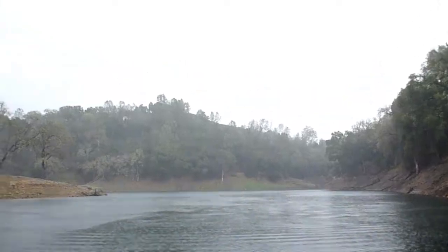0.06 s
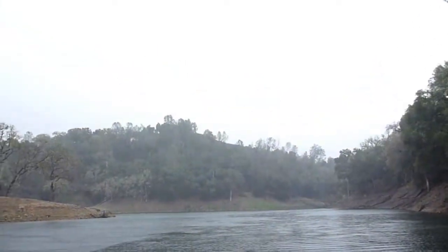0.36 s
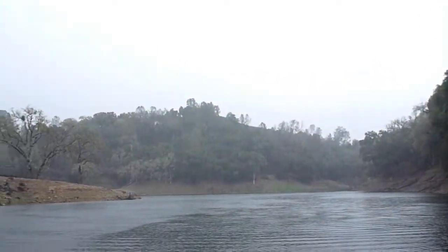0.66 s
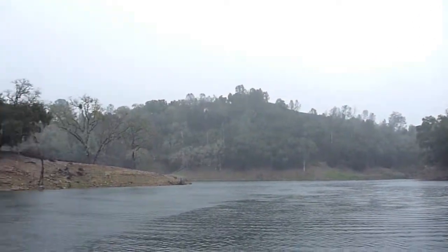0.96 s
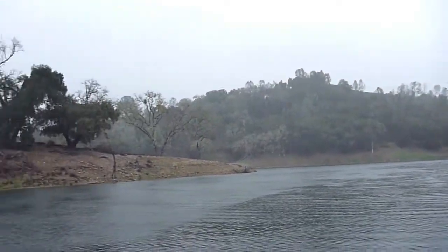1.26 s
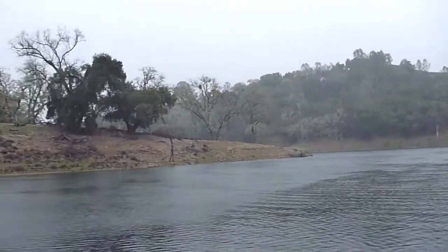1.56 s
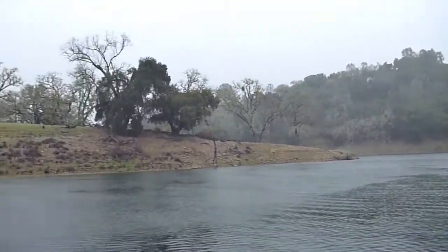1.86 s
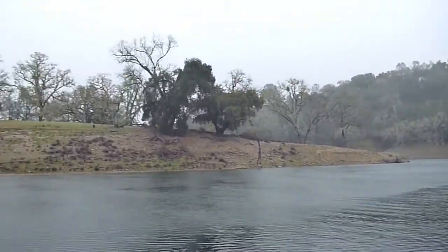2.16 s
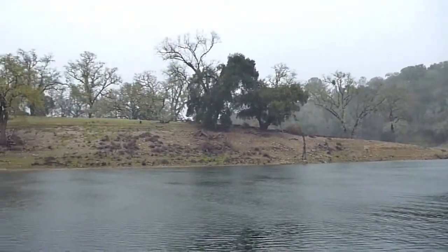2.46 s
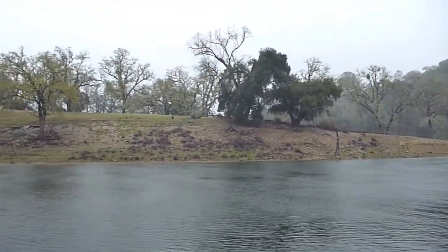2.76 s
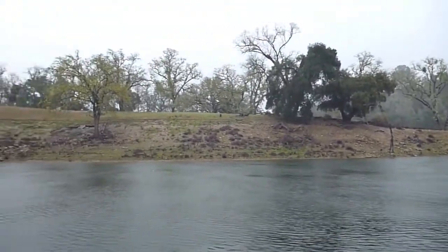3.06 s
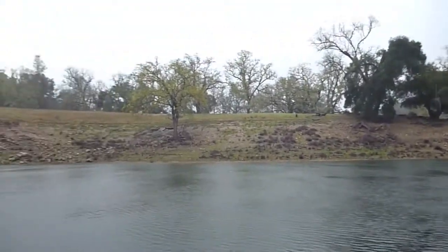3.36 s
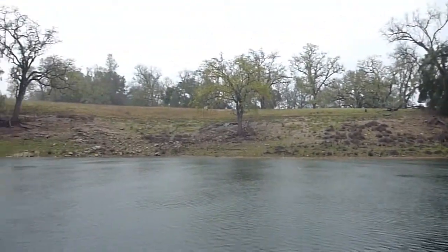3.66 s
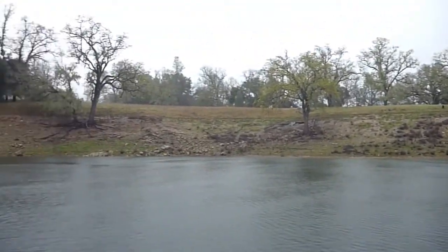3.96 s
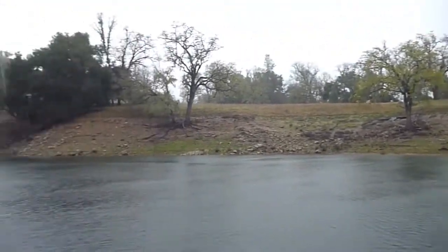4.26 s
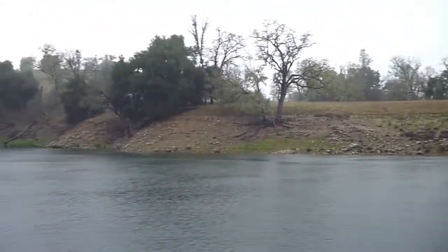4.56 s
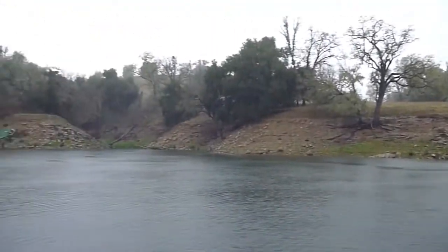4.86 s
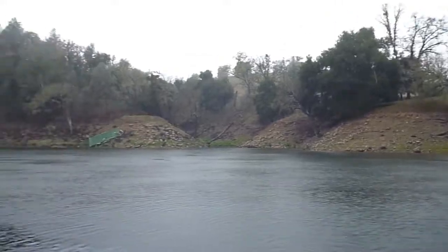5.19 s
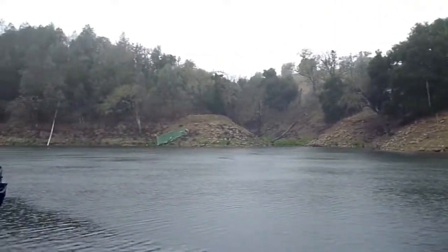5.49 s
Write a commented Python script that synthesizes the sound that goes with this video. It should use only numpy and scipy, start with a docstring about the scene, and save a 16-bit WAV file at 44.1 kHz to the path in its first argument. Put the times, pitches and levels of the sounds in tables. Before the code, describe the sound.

Steady rain falls on a lake, a soft wash of distant drops with nearer ones pattering and plinking on the water. In the first half, a few drops hit the hand-held camera with sharp ticks, much louder than the rain. The camera gives an occasional soft, low handling thump. Toward the end, some close drops stand out and a faint trickle of water rises.

```python
"""Steady rain on a lake, heard in mono from the microphone of a hand-held camera.
From the start, countless far drops merge into a soft wash, and nearer ones patter and plink.
In the first three seconds a few drops strike the camera itself with a sharp tick. Its lens motor whines
very faintly now and then, and its body thumps softly as it is turned in the hand.
In the second half, a soft trickle of water close by grows louder."""
import sys
import numpy as np
from scipy import signal
from scipy.fft import rfft, irfft, next_fast_len
from scipy.io import wavfile
from scipy.ndimage import uniform_filter1d

SR = 44100
rng = np.random.default_rng(int(sys.argv[2]) if len(sys.argv) > 2 else 0)


def master_out(mix):
    """Clip the mix to full scale and print it as 16-bit PCM to the path in sys.argv[1]."""
    frames = np.transpose(np.atleast_2d(mix))
    ceiling = np.clip(frames, -1, 1)
    pcm = np.round(ceiling * 32767).astype(np.int16)
    wavfile.write(sys.argv[1], SR, pcm)


N = 248283


def amp(db):
    """Decibels to gain."""
    return 10 ** (np.asarray(db) / 20)


def unit(x):
    """Scale to rms 1."""
    return x / np.sqrt(np.mean(x ** 2) + 1e-20)


def along(points, hz):
    """Read (Hz, value) points on a log axis."""
    f, v = np.transpose(points)
    return np.interp(np.log(hz + 1), np.log(f + 1), v)


def filtered(x, response):
    """Multiply the spectrum of x by response(hz)."""
    m = next_fast_len(N + SR // 2)
    return irfft(rfft(x, m) * response(np.fft.rfftfreq(m, 1 / SR)), m)[:N]


def cut(x, kind, hz, order):
    """A causal "low" or "high" pass."""
    return signal.sosfilt(signal.butter(order, hz, kind, fs=SR, output="sos"), x)


def place(times, sounds):
    """Sum short sounds, one a row, at their start times."""
    index = np.round(np.abs(times) * SR).astype(int).reshape(-1, 1) + np.arange(sounds.shape[1])
    return np.bincount(index.ravel(), sounds.ravel(), N)[:N]


def swell(t, rise):
    """An envelope that reaches 1 at the rise time and then dies away."""
    return t / rise * np.exp(1 - t / rise)


def patchy_noise(patchy_db):
    """White noise whose strength drifts in patches of time and frequency."""
    spectrum = signal.stft(rng.standard_normal(N), nperseg=512)[2]
    patches = uniform_filter1d(rng.standard_normal(spectrum.shape), size=8, axis=0)
    patches = uniform_filter1d(patches, size=12, axis=1)
    return signal.istft(spectrum * amp(patchy_db * unit(patches)), nperseg=512)[1][:N]


def splats(db, hz, cycles, splash_db, splash_s):
    """One row a drop: a pat that peaks after `cycles`, and a short noisy splash around the same pitch."""
    t = np.arange(SR // 60) / SR
    pat = swell(t, cycles / hz) * np.sin(2 * np.pi * hz * t)
    ratio = np.fft.rfftfreq(len(t), 1 / SR) / hz
    splash = irfft(rfft(rng.standard_normal(pat.shape)) * ratio / (1 + ratio ** 3), len(t))
    splash /= splash.std(axis=1, keepdims=True)
    return amp(db) * (pat + amp(splash_db) * splash * swell(t, splash_s))


def far_rain(hiss_hz, dulling_db_per_s):
    """Far off, drops all over the lake merge into a wash; its hiss slowly dulls as the camera turns."""
    # spectrum of the wash (frequency [Hz], relative density [dB])
    spectrum = [(20, -4), (60, -10.5), (130, -4), (280, 0), (600, -1), (1600, -2.5), (3000, -3.5),
                (4500, -8), (6500, -16.5), (8000, -21), (10000, -21), (12500, -27), (14400, -35.5),
                (15200, -20)]
    noise = patchy_noise(patchy_db=0.95)
    wash = amp(-0.73) * unit(filtered(noise, lambda hz: amp(along(spectrum, hz))))
    hiss = filtered(wash, lambda hz: hz ** 4 / (hz ** 4 + hiss_hz ** 4))
    from_middle_s = (np.arange(N) - N / 2) / SR
    return wash + hiss * (amp(-dulling_db_per_s * from_middle_s) - 1)


def patter(per_second, pitch_hz, pitch_spread, size_db):
    """Drops at middle distance, in flurries; bigger ones are rarer, higher ones ring for more cycles."""
    # strength of the flurries (time [s], relative level [dB])
    flurries = [(0, -9.5), (1.6, -4.5), (3.05, -7), (3.6, -4.5), (3.95, -10), (4.17, -2), (4.45, -8),
                (5.63, -6.5)]
    count = 2500
    gap, size, bubble = rng.random((count, 3)).T[:, :, None]
    times = np.cumsum(-np.log(1 - gap)) / per_second
    db = size_db * np.minimum(-np.log(1 - size), 3)
    hz = np.clip(pitch_hz * np.exp(pitch_spread * rng.standard_normal((count, 1))), 700, 5000)
    cycles = (0.2 + 0.87 * bubble ** 2) * np.sqrt(hz / pitch_hz)
    drops = place(times, splats(db, hz, cycles, splash_db=-11.0, splash_s=0.00085))
    flurry_db = np.interp(np.arange(N) / SR, *np.transpose(flurries))
    return amp(flurry_db) * unit(cut(drops, "low", hz=5400, order=4))


def trickle(per_second, pitch_hz, pitch_spread, cycles, rise_per_s):
    """Water trickles nearby: small bubbles of much the same size ring, each rising a little in pitch."""
    # strength of the trickle (time [s], level [dB])
    flow = [(0, -76), (3.1, -71), (3.4, -63), (3.7, -69), (4.2, -65), (4.9, -69), (5.2, -55.5), (5.4, -64),
            (5.6, -57)]
    count = 700
    when, size, pitch = rng.random((count, 3)).T[:, :, None]
    times = (np.arange(count)[:, None] + 2 * when) / per_second
    t = np.arange(SR // 25) / SR
    hz = pitch_hz * np.exp(pitch_spread * (2 * pitch - 1))
    phase = 2 * np.pi * hz * t * (1 + rise_per_s * t / 2)
    bubbles = amp(-10 * size) * swell(t, cycles / hz) * np.sin(phase)
    level_db = np.interp(np.arange(N) / SR, *np.transpose(flow))
    return amp(level_db) * unit(place(times, bubbles))


def near_drops(plop_hz):
    """Close by, single drops pat and push the water aside with a plop; some trap a bubble and plink."""
    # drops on the water (time [s], level [dB], pitch [Hz], splash [dB re pat], plop [dB re pat])
    landings = [(0.2193, -34, 1400, -11, -6), (0.2376, -29.5, 1500, -10.5, -6),
                (0.3554, -33, 2800, -9.5, -26), (.4121, -21.5, 3700, -24, -30),
                (.5287, -27.5, 2300, -16, -22), (0.5443, -33.5, 1300, -11, -6),
                (.7641, -30, 2600, -21, -28), (.8014, -34, 2100, -8, -2), (.821, -30.5, 3400, -13, -16),
                (.8665, -29, 2200, -17, -24), (0.8845, -31.5, 1750, -13, -18),
                (1.0148, -33, 1400, -12, -15), (1.1251, -29, 1800, -22, -24), (1.1528, -34, 2050, -12, -28),
                (1.2202, -29, 1400, -10, -7.5), (1.3239, -34, 3120, -7, -15),
                (1.5084, -31.5, 1200, -10, -19), (1.5147, -28.5, 2160, -12, -26),
                (1.6025, -34.5, 2300, -8, -26), (1.8085, -35, 1200, -14, -6), (1.8761, -30, 1150, -18, -10),
                (2.1324, -33, 1900, -13, -28), (2.2818, -32, 1750, -7, -13), (2.494, -36, 1920, -6, -22),
                (2.5661, -29, 1550, -14, -14), (2.5741, -35, 2300, -3, -22), (2.6553, -36, 1600, -11, -14),
                (3.1526, -34, 1600, -10, -14), (3.1609, -30.5, 1300, -11, -9), (3.194, -34, 2390, -10, -24),
                (3.299, -32, 1150, -8, -13), (3.4663, -33, 1600, -13, -18), (3.4767, -24.5, 1900, -15, -10),
                (3.4824, -28.5, 1250, -12, -12), (3.5118, -33.5, 2300, -16, -24),
                (3.5499, -33, 1500, -15, -16), (3.6467, -34.5, 1150, -11, -7),
                (3.677, -26, 1400, -12.5, -16), (3.6926, -30, 1300, -14, -15), (3.7674, -32, 1200, -10, -9),
                (3.7986, -32, 1500, -12, -14), (3.9284, -32.5, 1650, -10, -7),
                (3.9836, -29, 1800, -11.5, -13), (4.1707, -35, 1600, -14, -16), (4.18, -33, 1950, -15, -20),
                (4.373, -26.5, 1810, -16, -14), (4.4002, -33.5, 1600, -13, -16),
                (4.5884, -33, 1800, -13, -11), (4.5953, -31, 2050, -13, -17), (4.6157, -29, 1850, -14, -12),
                (4.6791, -22, 2240, -12, -11), (4.7381, -18, 2630, -13.5, -17.5),
                (4.7662, -36, 3100, -6, -18), (4.851, -36, 1950, -5, -11), (4.864, -33, 1300, -14, -12),
                (4.9709, -31.5, 1670, -12, -26), (5.0616, -34.5, 2150, -5, -20),
                (5.39, -36, 1900, -12, -12), (5.4552, -27.5, 1450, -15, -15), (5.464, -35, 1700, -14, -12),
                (5.5603, -35, 1600, -11, -11)]
    # trapped bubbles (time [s], level [dB], pitch [Hz], rise [cycles])
    bubbles = [(.6872, -38, 3700, 1.2), (0.756, -37, 4100, 1.1), (0.7861, -30.5, 5500, 1.2),
               (1.2754, -34.5, 2480, 1.4), (1.6653, -39, 1900, 1.1), (1.6803, -36, 1800, 0.92),
               (1.7571, -33.5, 3020, 1.1), (1.7665, -38, 1850, 1), (2.1876, -34.5, 1800, 1),
               (2.3328, -39, 1750, 1.1), (2.5502, -38, 1640, 1.4), (2.8323, -30.5, 2060, 1.5),
               (2.863, -36, 2200, 1.1), (2.9434, -36, 2050, 1), (3.3675, -36.5, 1830, 1.2),
               (3.3916, -36, 1390, 0.65), (3.421, -43, 2130, 3.3), (3.7086, -38, 1740, 1.2),
               (3.735, -39.5, 3200, 1.1), (3.8095, -37, 2270, 1.5), (3.9054, -36, 2000, 1),
               (4.0978, -37, 1950, 1.2), (4.1252, -38, 1750, 1), (4.1343, -37, 3800, 1.3),
               (4.515, -42, 4700, 2), (4.5301, -37.5, 1690, 1.1), (4.6673, -37, 2050, 1.2),
               (4.7229, -35, 2600, 1.2), (5.0765, -40, 2380, 2.4), (5.137, -38.5, 940, 0.73),
               (5.493, -37, 1640, 1), (5.529, -43, 1650, 1.5), (5.539, -46, 1660, 3.7),
               (5.575, -32, 1630, 1)]
    t = np.arange(SR // 60) / SR
    times, db, hz, splash_db, plop_db = np.transpose(landings)[:, :, None]
    rise_s = 0.00017 * 2 ** ((-32 - db) / 12.5)  # a drop 12.5 dB harder peaks in half the time
    plop = amp(db + plop_db) * swell(t, rise=0.00027) * np.sin(2 * np.pi * plop_hz * t)
    pats = place(times, splats(db, hz, hz * rise_s, splash_db, splash_s=0.00072) + plop)
    times, db, hz, cycles = np.transpose(bubbles)[:, :, None]
    plinks = place(times, splats(db, hz, cycles, splash_db=-6.0, splash_s=0.00021))
    drops = cut(pats + plinks, "high", hz=414, order=2)
    return cut(drops, "low", hz=5400, order=4)


def camera_drops(ping_hz, crack_hz):
    """Right at the microphone, a drop cracks on the casing, rings it briefly and throws a fine spray."""
    # direct hits (time [s], ring [dB], ring pitch [Hz], ring length [factor], ping [dB],
    # spray [dB], spray pitch [Hz], spray rise [cycles], crack [dB])
    strikes = [(0.7345, -14.5, 2800, 0.75, -32, -47, 11700, 2.5, -32.5),
               (0.9737, -5.5, 2700, 1.53, -30, -32.5, 9600, 2.7, -52),
               (2.118, -27.5, 3050, 0.53, -42, -30.5, 11450, 2.5, -32),
               (2.4143, -20, 2640, 1.47, -46, -39, 5780, 2.3, -30),
               (2.7204, -35, 2970, 1.4, -52, -34, 5800, 3.7, -39)]
    # modes of the casing (pitch [multiple of ring pitch], level [dB re ring], base rise time [s])
    casing = [(1, 0.5, 0.00027), (.6, -50, 0.00011), (1.85, -19, 0.00026)]
    columns = np.transpose(strikes)[:, :, None]
    times, db, hz, length, ping_db, spray_db, spray_hz, spray_cycles, crack_db = columns
    t = np.arange(SR // 60) / SR
    ring = sum(amp(db + level) * swell(t, rise * length) * np.sin(2 * np.pi * multiple * hz * t)
               for multiple, level, rise in casing)
    # the longest mode pings at one pitch wherever the drop lands
    ping = amp(ping_db) * swell(t, rise=0.0012) * np.sin(2 * np.pi * ping_hz * t)
    spray = splats(spray_db, spray_hz, spray_cycles, splash_db=-6.5, splash_s=0.00039)
    crack = splats(crack_db, np.full(times.shape, crack_hz),
                   cycles=0.47, splash_db=-12.0, splash_s=0.00024)
    hits = cut(place(times, ring + ping + spray + crack), "low", hz=12300, order=4)
    return cut(hits, "high", hz=970, order=4)  # so small a shell radiates little bass


def lens_motor(step_hz, depth, rough, upper_hz):
    """Inside the camera, two thin, rough whines pulse at the stepping rate of the motor."""
    # runs of the motor (start [s], end [s], lower pitch [Hz], lower whine [dB], upper whine [dB])
    runs = [(.75, .9, 11080, -76, -74), (.92, 1.29, 11600, -77, -89), (2.76, 3.15, 11550, -74, -84),
            (5.265, 5.61, 11600, -74, -85)]
    t = np.arange(N) / SR
    jitter = unit(cut(rng.standard_normal(N), "low", hz=350, order=2))
    pulsing = unit(1 + depth * np.cos(2 * np.pi * step_hz * t) + rough * jitter)
    gate = lambda start, end: np.clip(np.minimum(t - start, end - t) / .01, 0, 1)
    whine = lambda hz, db: amp(db) * unit(np.sin(2 * np.pi * hz * t))
    return pulsing * sum(gate(start, end) * (whine(hz, db) + whine(upper_hz, upper_db))
                         for start, end, hz, db, upper_db in runs)


def handling(contact_cycles):
    """Each shift of the grip thumps the camera; a softer touch builds slower and mutes upper modes."""
    # knocks of the hand (time [s], level [dB], muffled above [Hz], grip firmness [pitch factor])
    knocks = [(1.6525, -35, 370, 1.04), (1.671, -44, 260, 0.95), (1.706, -41, 340, 1.35),
              (1.724, -41.5, 210, 1), (3.338, -42, 210, 0.89), (4.525, -48, 170, 1.03),
              (4.6075, -39, 900, 1.14), (4.623, -38, 280, 1.27), (5.337, -39, 180, 1.05),
              (5.361, -46, 160, 0.93)]
    # modes of the held body (base pitch [Hz], relative level [dB], time to fall 60 dB [s])
    body = [(79.4, -8.5, 0.18), (150, 3, 0.054), (206, 0.5, 0.084), (281, 5, 0.038)]
    times, db, muffle_hz, grip = np.transpose(knocks)[:, :, None]
    t = np.arange(SR // 6) / SR
    thump = 0
    for hz, level, t60 in body:
        pitch = hz * grip * np.exp(0.073 * rng.standard_normal(times.shape))  # the grip detunes the body
        contact = 1 / np.sqrt(1 + (pitch / muffle_hz) ** 6)
        thump = thump + contact * amp(db + level - 60 * t / t60) * np.sin(2 * np.pi * pitch * t)
    build_up = 1 - np.exp(-t * muffle_hz / contact_cycles)
    return place(times, thump * build_up)


def scene():
    """The camera at the microphone, the trickle nearby and the rain across the lake, in one channel."""
    camera = camera_drops(ping_hz=3120, crack_hz=10100) + handling(contact_cycles=0.87)
    camera += lens_motor(step_hz=170, depth=0.8, rough=1.0, upper_hz=12700)
    bubbles = trickle(per_second=70, pitch_hz=1529, pitch_spread=.11, cycles=5.4, rise_per_s=2.1)
    middle = patter(per_second=300, pitch_hz=1910, pitch_spread=0.36, size_db=3.5)
    far = far_rain(hiss_hz=2400, dulling_db_per_s=0.41)
    near = near_drops(plop_hz=674)
    return (amp(-50) * (far + middle) + near + bubbles + camera)[None]


def record(dry):
    """The recorder cuts the deep bass, has a narrow notch in the treble and a band limit."""
    notch_hz, width_hz, top_hz = 7950, 650, 15200
    sound = cut(dry[0], "high", hz=54.3, order=3)
    notch = lambda hz: (notch_hz ** 2 - hz ** 2) / (notch_hz ** 2 - hz ** 2 + 2j * hz * width_hz)
    band_limit = lambda hz: np.clip((top_hz - hz) / 1200, 0, 1)
    return filtered(sound, lambda hz: notch(hz) * band_limit(hz))[None]


dry = scene()
out = record(dry)
master_out(out)
```